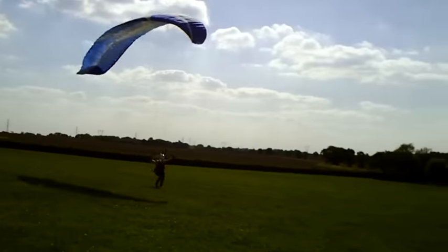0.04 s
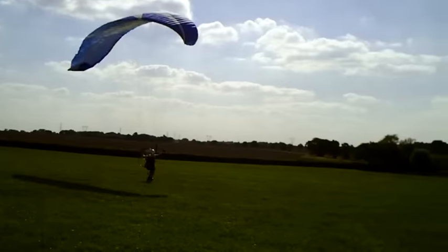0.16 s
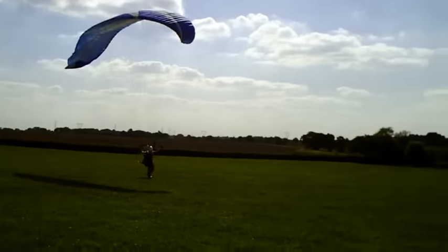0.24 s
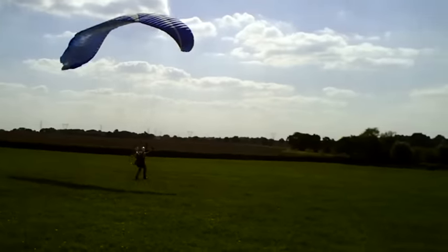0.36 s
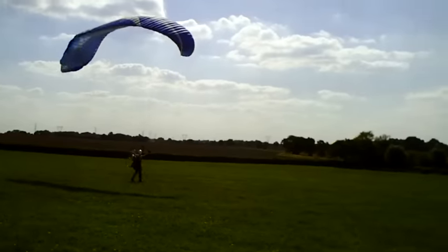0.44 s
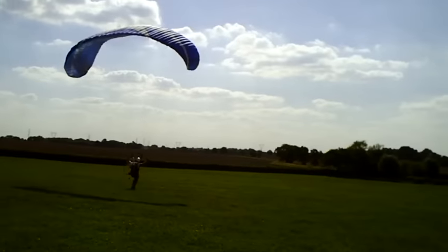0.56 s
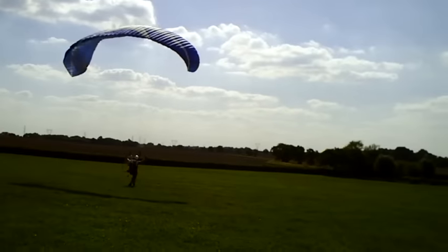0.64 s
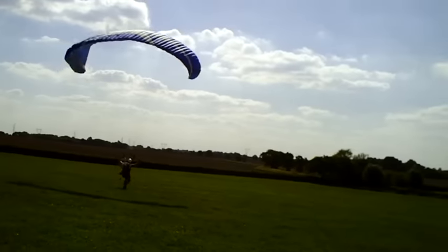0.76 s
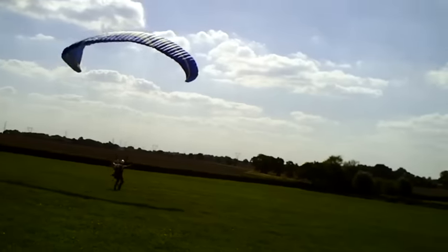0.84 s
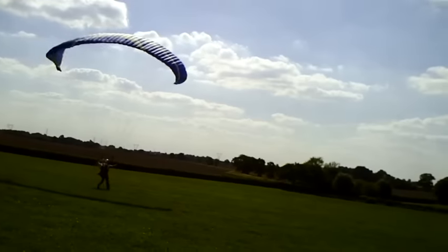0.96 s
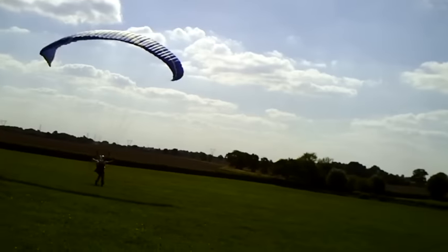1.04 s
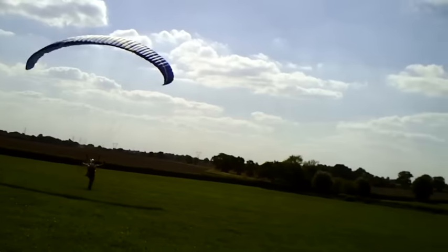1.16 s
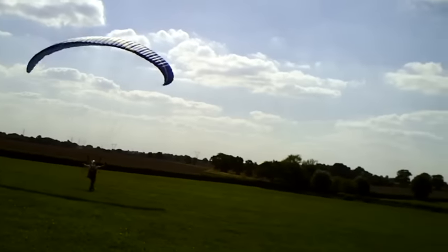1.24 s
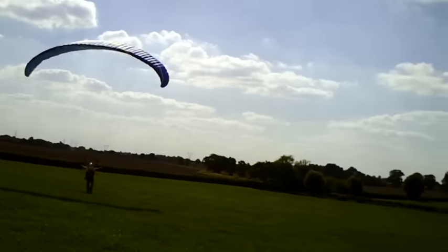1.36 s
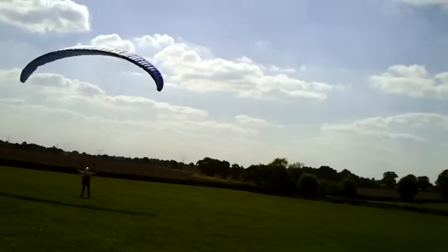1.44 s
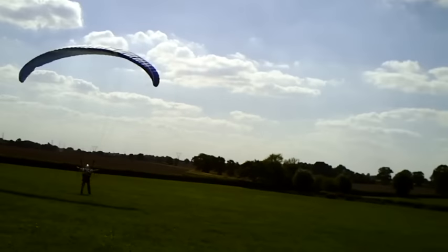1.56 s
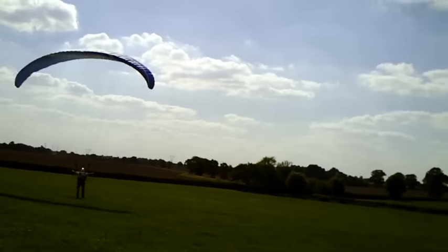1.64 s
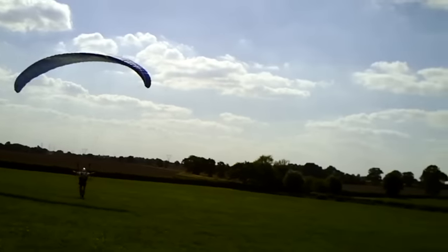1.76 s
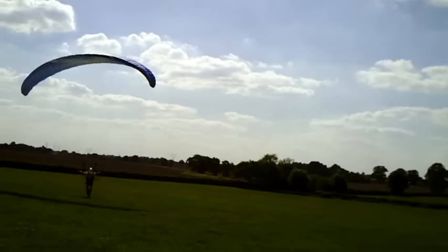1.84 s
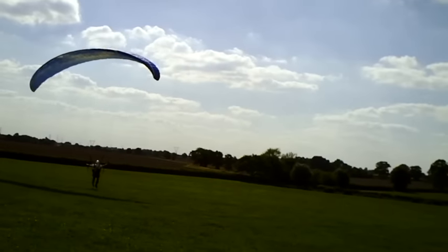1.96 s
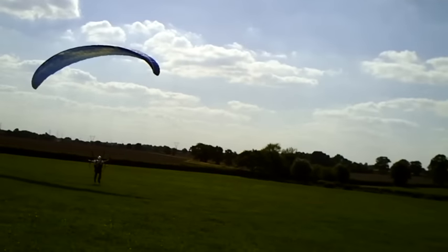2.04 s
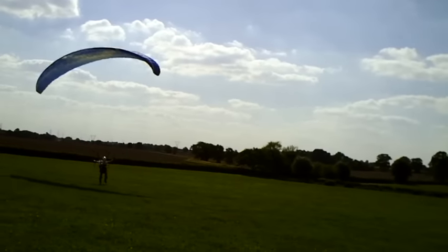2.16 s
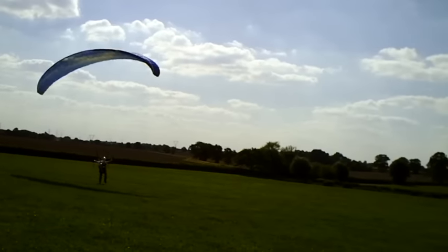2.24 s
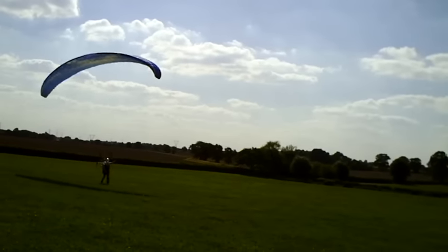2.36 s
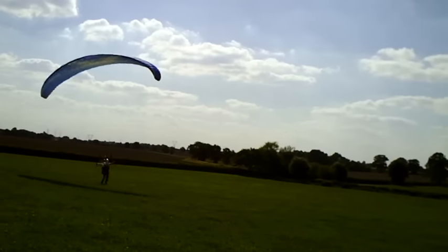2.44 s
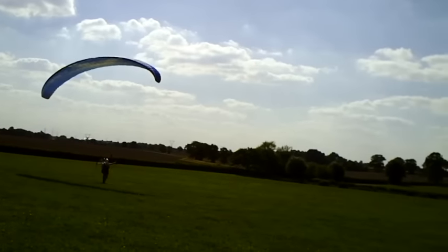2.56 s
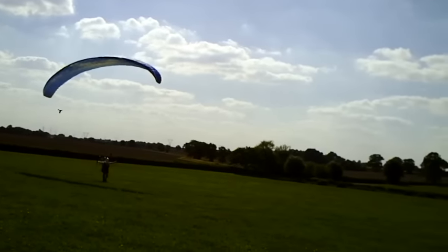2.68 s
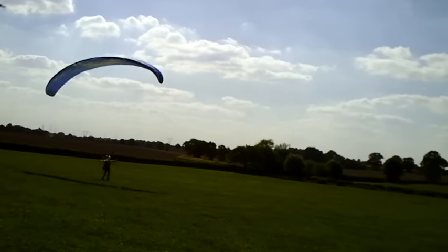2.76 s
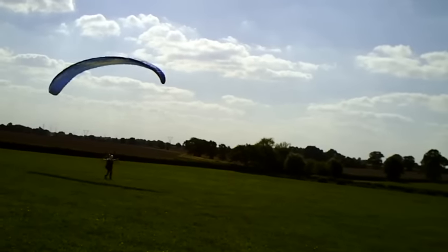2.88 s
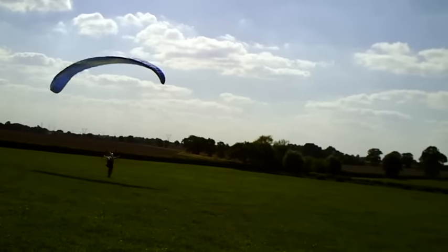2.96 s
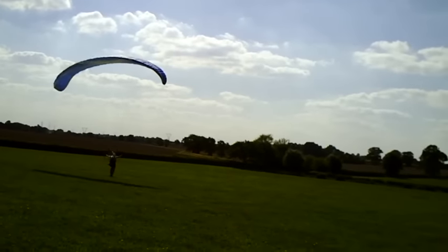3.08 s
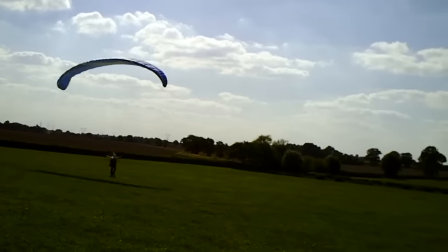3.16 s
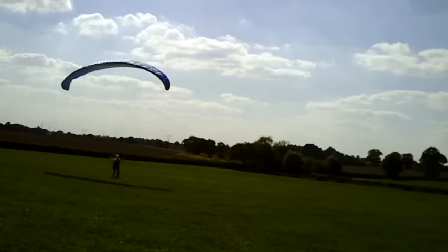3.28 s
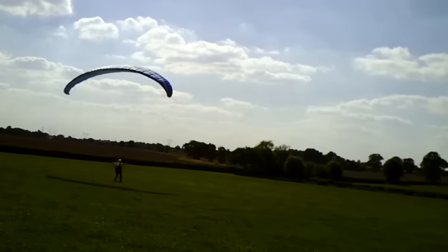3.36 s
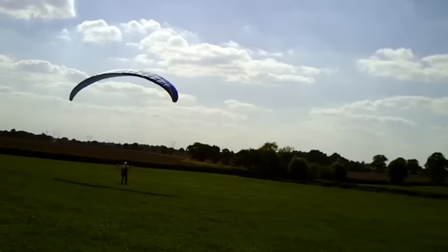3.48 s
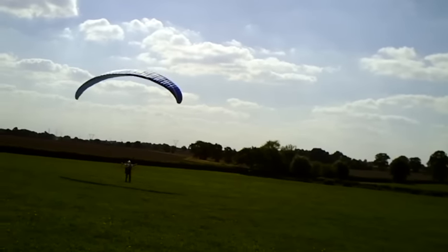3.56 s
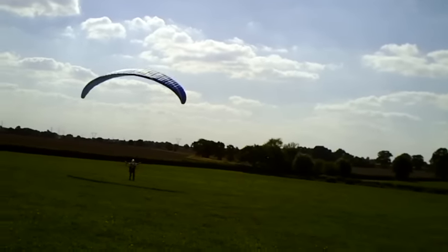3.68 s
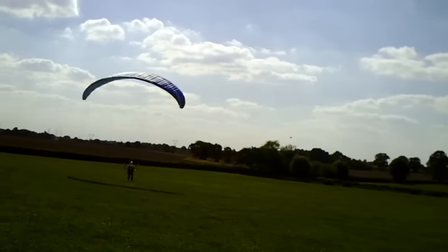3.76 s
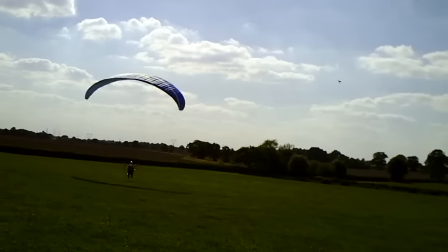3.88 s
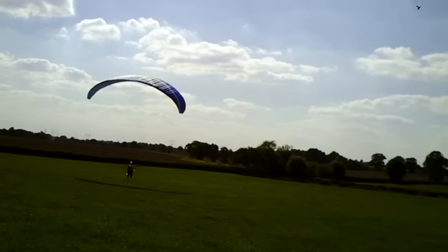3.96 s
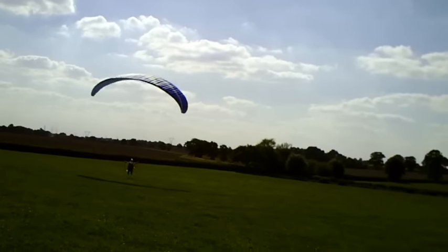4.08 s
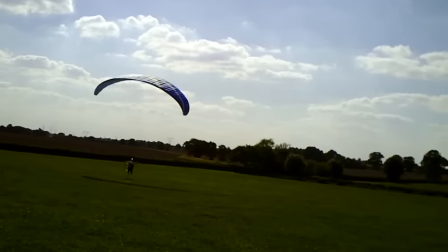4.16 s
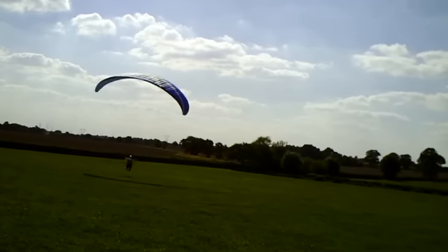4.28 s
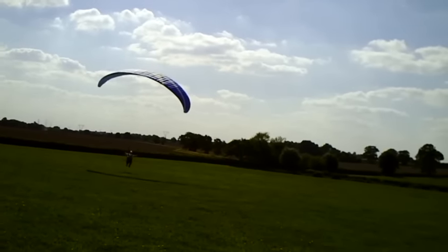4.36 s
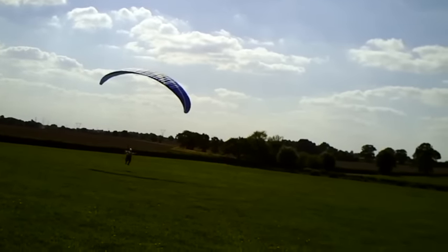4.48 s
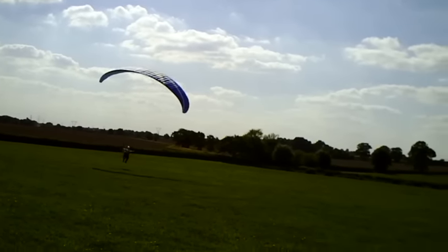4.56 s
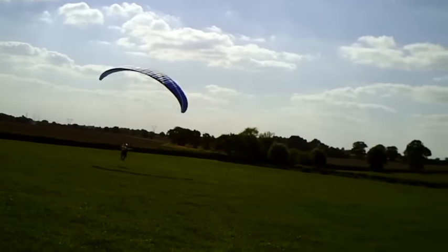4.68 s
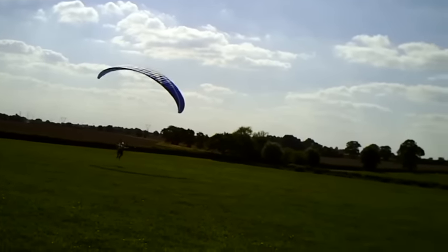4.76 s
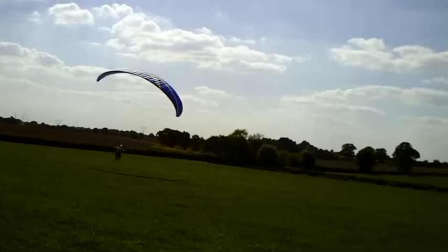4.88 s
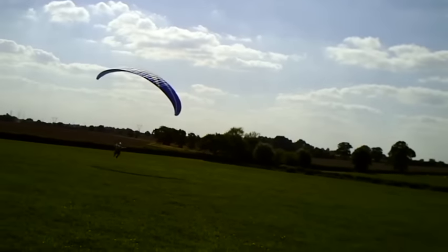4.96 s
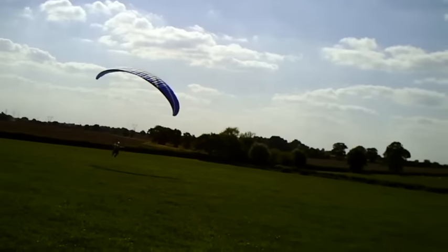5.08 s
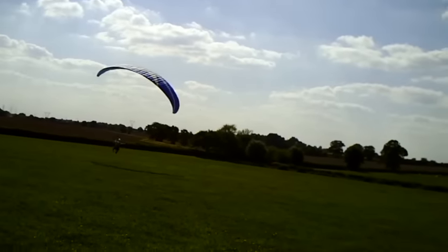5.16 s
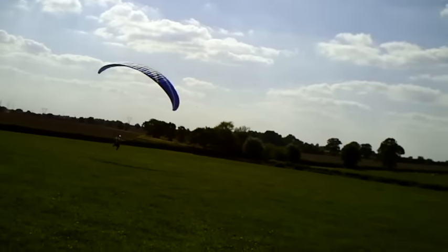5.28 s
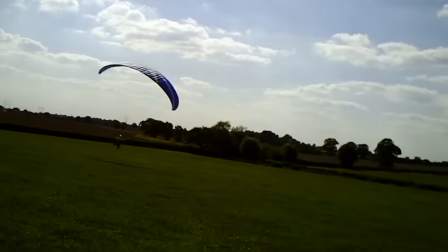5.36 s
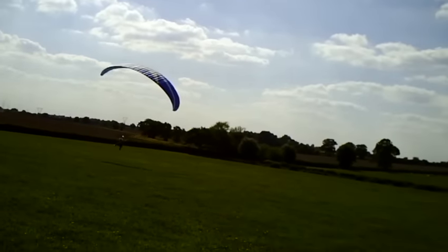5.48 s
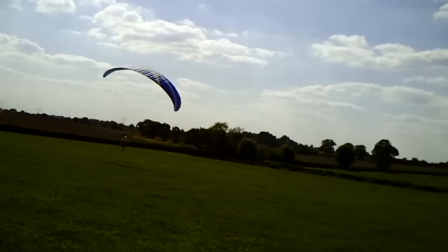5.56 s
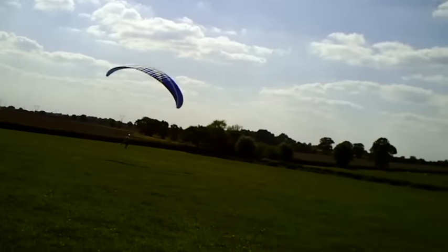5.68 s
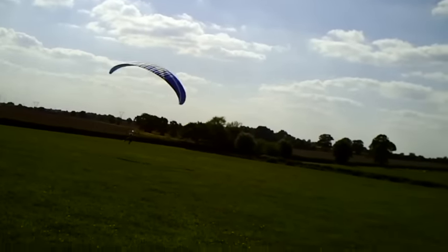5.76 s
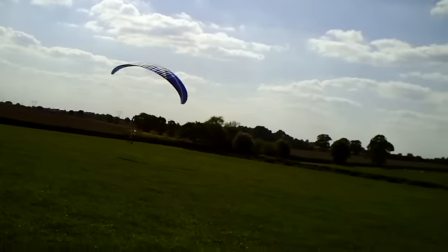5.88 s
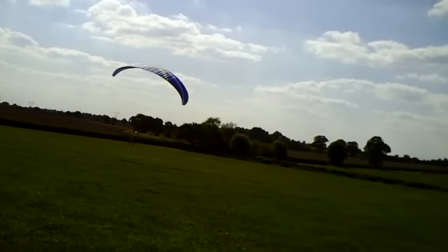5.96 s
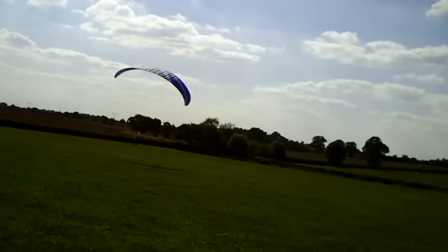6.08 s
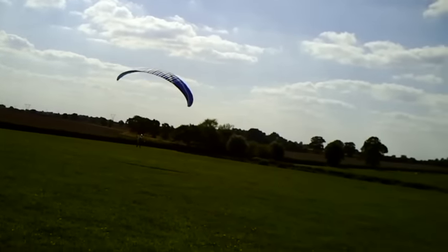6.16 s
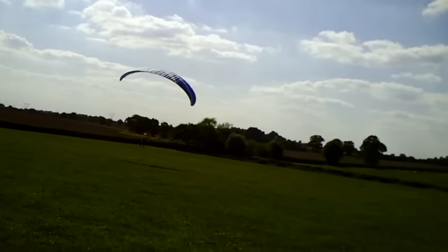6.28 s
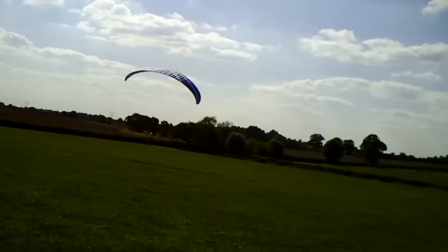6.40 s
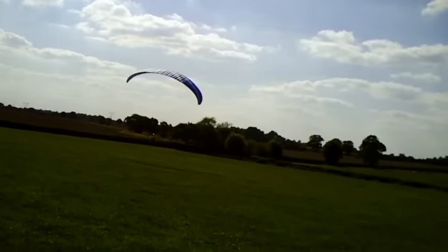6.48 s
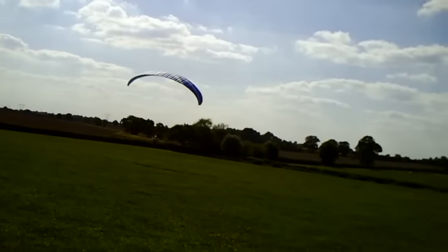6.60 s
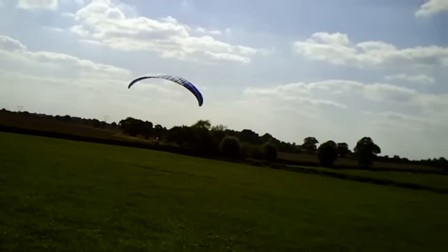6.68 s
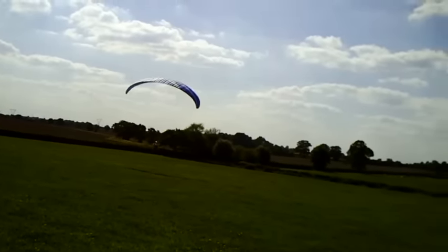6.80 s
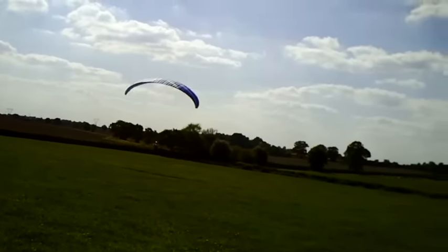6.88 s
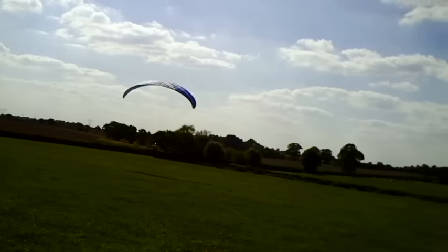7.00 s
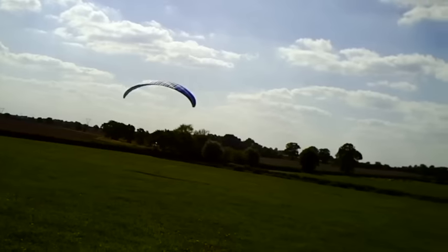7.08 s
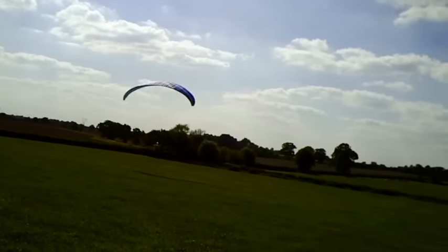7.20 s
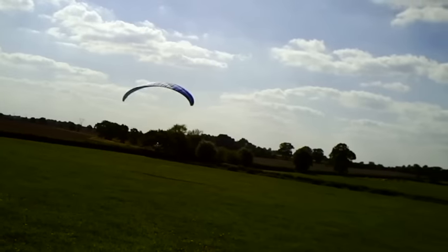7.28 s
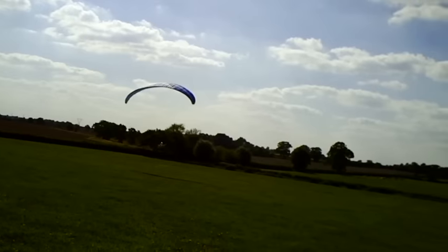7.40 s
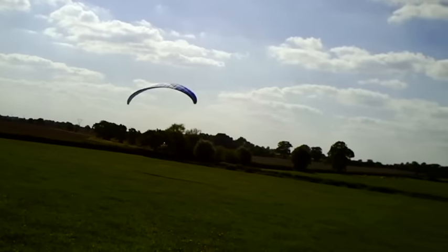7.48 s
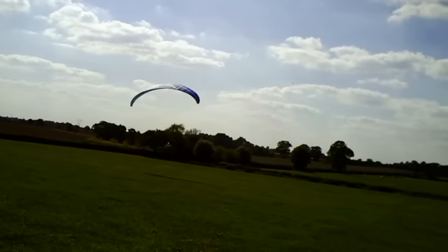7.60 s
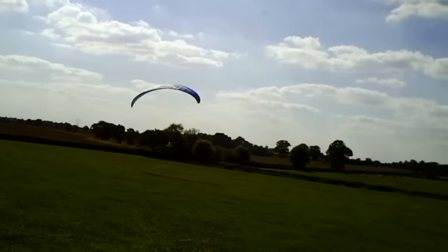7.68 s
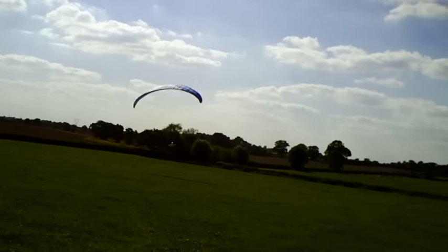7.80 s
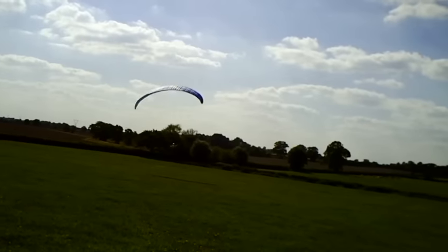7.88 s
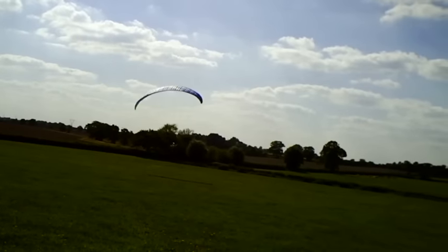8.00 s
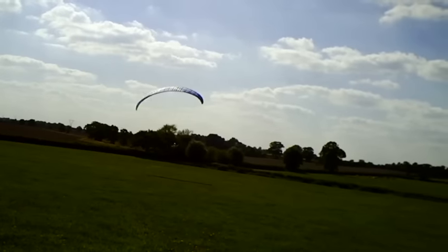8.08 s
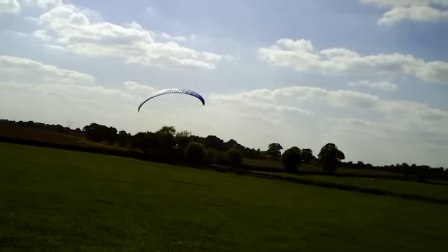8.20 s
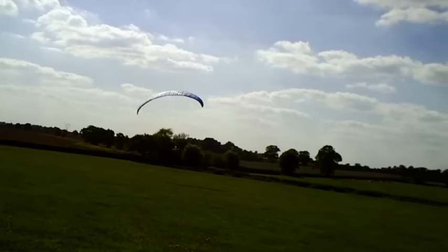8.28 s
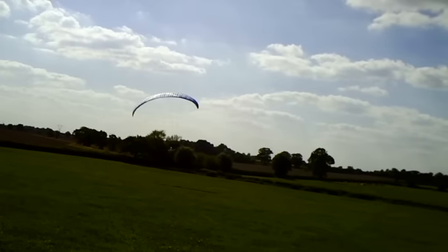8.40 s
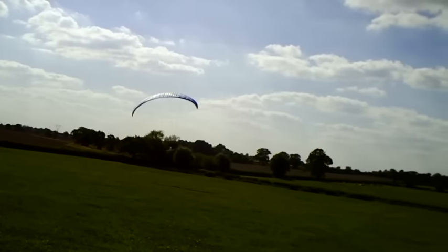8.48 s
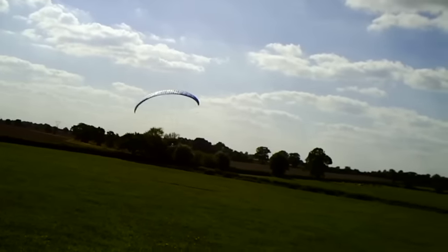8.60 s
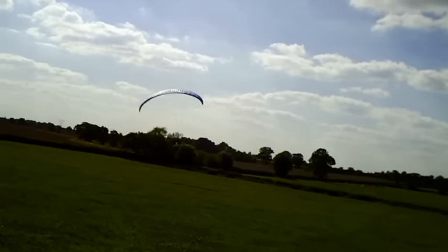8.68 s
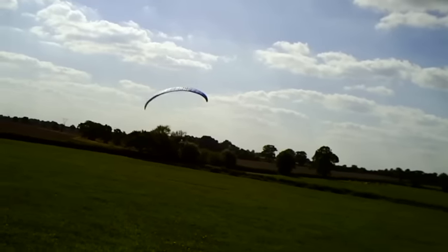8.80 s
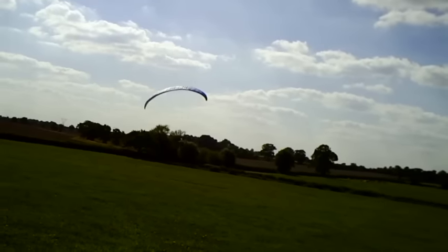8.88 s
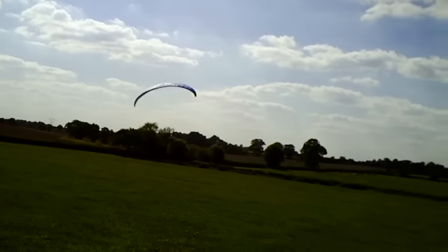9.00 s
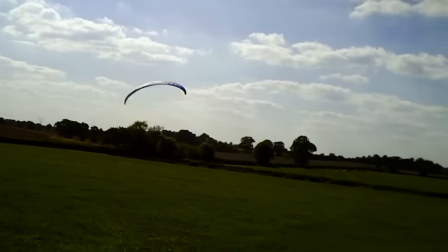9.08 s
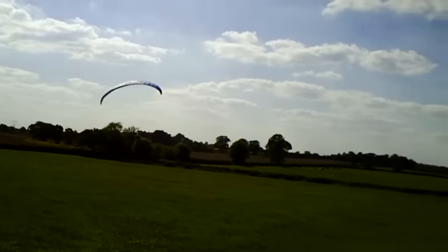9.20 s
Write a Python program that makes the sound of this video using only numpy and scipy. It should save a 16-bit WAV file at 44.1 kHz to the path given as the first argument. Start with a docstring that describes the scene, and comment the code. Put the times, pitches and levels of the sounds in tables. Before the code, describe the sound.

From 0 s a small two-stroke engine is already at full power, about twenty metres away on an open field: a fast, raspy, metallic bark of roughly 155 pops a second, with propeller wash and a low, steady drone beneath. Pitch barely changes. Hard cracks spit out around 0.5, 0.7 and 1.4 s, and light wind bumps the microphone early on. The bark dulls near 2 s, surges bright and harsh around 2.5-2.9 s with another crack, then weakens to a deep dip at 4 s. It returns more distant at 4.4-5.2 s, dips near 5.7 s, and swells ever more faintly around 6, 6.7, 7.4 and 8.3-8.7 s, with a hollow, shifting ground-reflection colour and thinning treble. Soft low gusts buffet the microphone near 6.2, 7.1, 8 and 8.6-9.1 s as the engine fades to a weak buzz by 9.2 s.

```python
"""A barking two-stroke is heard first: a paramotor at full power on a field, over a low drone.
It starts 22 m from the microphone, lifts off and climbs away; its sound swells and dulls as the pilot turns.
The single fires four times per propeller turn, and each pop rings the silencer and echoes off the blades.
Shaft-locked sines make the drone; the ground reflects the exhaust by a delayed copy.
Filtered noise makes the gusts that buffet the microphone, and a few firings crack much harder."""
import sys
import numpy as np
from scipy import signal
from scipy.fft import rfft, irfft, next_fast_len
from scipy.io import wavfile
from scipy.ndimage import map_coordinates

SR = 44100
rng = np.random.default_rng(int(sys.argv[2]) if len(sys.argv) > 2 else 0)


def int16_out(signal):
    """Quantize to a 16-bit WAV file."""
    q = np.round(np.clip(np.atleast_2d(signal).T, -1, 1) * 32767)
    wavfile.write(sys.argv[1], SR, q.astype(np.int16))


N = 407925

# In the tables, beamed is dB per dB of BARK_SWING's beaming, fades is dB per dB of distance loss.

# exhaust loudness as the pipe turns to and from the microphone: start_s, level_db
BARK_SWING = [(0.0, -12.5), (0.1, -13), (1.08, -17), (1.18, -13), (1.57, -17), (1.93, -25.5), (2.13, -25.5),
              (2.52, -14), (2.78, -12), (2.99, -15), (3.3, -15), (3.37, -17.5), (3.73, -19.5), (3.76, -22),
              (4.04, -34), (4.43, -19.5), (5.1, -16), (5.69, -23.5), (5.9, -18), (6.29, -23), (6.72, -20),
              (7.13, -26), (7.37, -22), (8.06, -26.5), (8.27, -21.5), (8.68, -21.5), (9.25, -36)]
# propeller shaft speed: start_s, speed_turns_per_s
SHAFT_SPEED = [(0, 38.74), (.2, 38.69), (.38, 38.9), (.55, 38.69), (1.2, 39.06), (1.55, 39.14),
               (1.75, 39.31), (2.7, 39), (3.1, 38.96), (3.3, 38.82), (4.2, 38.96), (5, 38.87), (5.6, 39.01),
               (6.7, 39.38), (7.95, 39.22), (8.25, 39.03), (8.7, 38.96), (9.25, 39.05)]
# the four firings of one propeller turn: direct_db, blade_echo_db, echo_delay_ms, jet_puff_db
FIRINGS = [(-4, -8.5, 2.06, -3), (-1.5, -5.5, 2.148, -5.5), (-0.5, -5.5, 2.188, 1.5),
           (-5.5, -8.5, 2.067, -3)]
# overall colour of the exhaust: pitch_hz, relative_level_db
EXHAUST_COLOUR = [(100, -53), (300, -19.5), (420, -22), (600, -8), (800, -9), (1050, -1.5), (1600, 3.5),
                  (2000, -4), (3100, -9), (4400, -12.5), (6800, -22), (9300, -25), (12800, -47.5),
                  (14000, -66)]
# narrow peaks and hollows of silencer and cage: pitch_hz, width_hz, level_db
SILENCER = [(1690, 120, 1.5), (2220, 107, -8.5), (2540, 116, 4), (2865, 33.5, -21), (3108, 160, 7.5),
            (3470, 172, -10), (4176, 36, 8), (4204, 130, -5), (5330, 227, -9.5), (5905, 54, -17),
            (6780, 190, 4), (8320, 160, -5.5)]
# change of colour once airborne and seen from behind: pitch_hz, width_hz, level_db
ASTERN = [(407, 76, -6.5), (4500, 750, -3.5), (5510, 240, 8.5), (7950, 210, -8), (8260, 160, 11.5)]
# passage into the airborne colour: start_s, airborne_share
LIFT_OFF = [(3.7, 0), (4.3, 1)]
# hardness of the pops, greatest with the pipe straight at the microphone: start_s, hard_edge_gain
HARDNESS = [(0, 0.6), (.7, 1.02), (1.45, .6), (1.85, 0.26), (2.3, 0.66), (2.8, 1.2), (2.88, 0.79),
            (2.95, 0.14), (3.7, 0), (4.8, 0.41), (9.25, 0)]
# tilt of the propeller wash: pitch_hz, relative_level_db
WASH_TILT = [(100, 11), (700, -3.5), (1100, 4.5), (1700, 1.5), (3000, -1.5), (12000, 1)]
# first cancellation by the ground reflection: start_s, pitch_hz, reflected_share
GROUND_NOTCH = [(0, 2200, 0.15), (5, 2240, 0.15), (5.6, 2050, 0.38), (6.9, 2260, 0.73), (7.2, 2020, 0.88),
                (8, 1890, 0.85), (8.6, 1860, 1), (9.25, 1500, 0.83)]
# body, bark and rasp of the exhaust:
# upper_edge_hz, head_on_db (before a common trim), beamed, fades, db_per_unit_of_hardness
RANGES = [(1006, -25.5, 0.55, 0.39, 0), (2060, -15, 1, 0.98, -2), (4920, -20.5, 0.87, 1, 3.5)]
# treble above those ranges: start_s, level_db
SIZZLE = [(0.0, -28), (1.03, -34), (1.11, -27.5), (1.91, -35), (2.24, -27.5), (2.81, -27.5), (4.04, -43),
          (4.38, -36.5), (5.07, -34.5), (5.77, -42.5), (5.95, -34.5), (6.18, -44), (6.54, -35.5),
          (7.13, -49), (7.34, -38), (7.91, -44), (8.94, -42), (9.25, -46.5)]
# low tones of the propeller: multiple_of_shaft_speed, starting_level_db, fades
BLADE_ORDERS = [(1, -37, 0.6), (2, -30, 1), (3, -29.5, 1.7), (5, -43, 0), (6, -29, 1.32), (7, -44.5, 1.3),
                (9, -36, 2.5), (11, -42.5, 3), (13, -38.5, 1.03), (15, -44, 0)]
# overtones of the tuned pipe: multiple_of_firing_rate, head_on_db, beamed, fades
PIPE_TONES = [(2, -33, -0.1, 1.3), (3, -35.5, 0.2, 2.15), (4, -34.5, .5, .5), (5, -36, 0.55, 0.27),
              (7, -31, 1.26, 0.8), (8, -31.5, 1, 0.5), (9, -34, 1.3, .7), (10, -30, 1.5, 0.63)]
# whine above the firing rate: start_s, level_db
WHINE = [(0, -36), (1.4, -31.5), (2, -39), (3.65, -28.5), (3.95, -48), (4.55, -32.5), (7.3, -40),
         (8.65, -27.5), (9.25, -37)]
# sidebands where the blades chop the exhaust: multiple_of_shaft_speed, head_on_db
BARK_ORDERS = [(17, -41), (19, -37), (21, -45), (22, -40), (23, -37), (25, -39.5), (26, -38), (27, -33.5),
               (29, -33.5), (30, -33), (31, -34.5), (34, -46), (37, -35), (38, -33), (41, -37)]
# hum at the firing rate: start_s, level_db
HUM = [(0, -19.5), (.95, -18), (1.5, -28), (2.1, -29.5), (2.33, -43), (2.6, -26), (3.05, -21), (3.7, -30),
       (4.7, -35), (6.5, -35), (7, -49), (8.6, -43), (9.25, -38)]
# gusts on the microphone: start_s, length_s, level_db
GUSTS = [(.3, 0.82, -32.5), (.72, 0.12, -27), (6.182, 0.37, -31), (7.106, 0.063, -33), (8.037, 0.35, -32.5),
         (8.58, .1, -31.5), (8.84, 0.29, -28)]
# colour of the buffeting: pitch_hz, relative_level_db
RUMBLE = [(15, -8), (35, -3), (90, 1), (170, -1), (280, -10.5), (450, -11.5), (1000, -39), (3000, -80)]
# colour of the air over the field: pitch_hz, relative_level_db
BREEZE = [(100, 0), (400, -5), (1500, -5), (4000, 2), (5500, -17), (9000, -17), (13000, -32)]
# the hardest exhaust cracks: start_s, level_db
CRACKS = [(.473, 3), (.712, 2), (1.399, 3), (1.450, 2), (2.855, 4), (3.478, -5), (5.136, -4), (5.535, -6),
          (6.872, -10)]

START_M, AWAY_M_PER_S = 22, 6.1  # distance at the start, and how fast it grows
HEAD_ON_DB = -12.5  # BARK_SWING value at the starting distance with the pipe facing the microphone
SIDEBAND_BEAMED, SIDEBAND_FADES = 1, 0.87
WHINE_MULTIPLE = 6  # of the firing rate
WAVER_DB_PER_MULTIPLE = 0.34  # higher overtones waver more in the moving air
GUST_RISE_S, GUST_FALL_S = 0.033, 0.12  # exponential time constants
LULL_DB = -43.5  # the buffeting between gusts
TOP_HZ = 13700  # upper limit of the microphone channel


def amp(db):
    """Decibels to gain."""
    return np.exp(np.asarray(db) * (np.log(10) / 20))


def unit(x):
    """Scale to rms 1."""
    return x / np.sqrt(np.mean(x ** 2) + 1e-20)


def along(points, hz):
    """Interpolate (pitch_hz, value) points on a log pitch axis."""
    pitch_hz, values = np.transpose(points)
    return np.interp(np.log(hz + 1), np.log(pitch_hz + 1), values)


def curves(rows):
    """One value per sample for each column after the time."""
    start_s, *columns = np.transpose(rows)
    t = np.arange(N) / SR
    return [np.interp(t, start_s, column) for column in columns]


def wobble(rate):
    """A smooth random curve, rate knots a second."""
    knots = rng.standard_normal(int(N * rate / SR) + 4)
    coarse = np.linspace(0, N, N // 128)
    smooth = map_coordinates(knots, [coarse * rate / SR])
    return np.interp(np.arange(N), coarse, smooth)


def filtered(x, response):
    """Multiply the spectrum of x by a response of frequency."""
    size = next_fast_len(N + SR // 2)
    hz = np.fft.rfftfreq(size, 1 / SR)
    return irfft(rfft(x, size) * response(hz), size)[:N]


def pulses(at, sizes):
    """Band-limited impulses at fractional sample positions."""
    taps = np.floor(at)[:, None] + np.arange(-7, 9)
    off = taps - at[:, None]
    shape = np.sinc(off) * np.cos(np.pi * off / 16) ** 2
    places = np.clip(taps, 0, N).astype(int).ravel()
    return np.bincount(places, (shape * sizes[:, None]).ravel(), N + 1)[:N]


def distance_loss():
    """Spreading loss as the craft moves away: a negative dB value for each sample."""
    return -20 * np.log10(1 + AWAY_M_PER_S * np.arange(N) / SR / START_M)


def heard(db, beamed, fades):
    """Gain of one part of the engine sound, from the heading of the pipe and the distance."""
    loss_db = distance_loss()
    beam_db = curves(BARK_SWING)[0] - HEAD_ON_DB - loss_db
    return amp(db + beamed * beam_db + fades * loss_db)


def silencer_ring(peaks, size=4096):
    """Minimum-phase, causal impulse response of the exhaust system, by way of its cepstrum."""
    hz = np.fft.rfftfreq(size, 1 / SR)
    db = along(EXHAUST_COLOUR, hz)
    for pitch_hz, width_hz, level_db in peaks:
        db = db + level_db * np.exp(-.5 * ((hz - pitch_hz) / width_hz) ** 2)
    cepstrum = irfft(np.log(amp(db)))
    cepstrum[1:size // 2] *= 2
    cepstrum[size // 2 + 1:] = 0
    return irfft(np.exp(rfft(cepstrum)))


def firings(turns, scatter_db, hard_db, jitter_ms, sway_ms, cage_db, cage_ms, jet_db, jet_ms, gusty_db, wash_db):
    """One uneven pop per firing, its echoes off blade and cage, a puff of jet noise, and the propeller's wash."""
    count = len(FIRINGS)
    at = np.interp(np.arange(1, int(turns[-1] * count)) / count, turns, np.arange(N))
    ms = np.arange(SR // 50) * 1000 / SR
    # the frame sways on the running pilot, so the echo paths shift and overtones trade strength
    sway = wobble(2.5)
    pops, puffs, fronts = np.zeros(N), np.zeros(N), np.zeros(N)
    for k, (direct_db, echo_db, delay_ms, puff_db) in enumerate(FIRINGS):
        nominal = at[k::count]
        chance = rng.standard_normal((len(nominal), 6))
        when = nominal + jitter_ms * chance[:, 0] * SR / 1000
        # about one charge in six burns harder than the rest
        harder_db = hard_db * np.clip(chance[:, 4] - 1, 0, 1)
        force_db = harder_db + scatter_db * np.clip(chance[:, 1], -2, 1.5)
        direct = pulses(when, amp(direct_db + force_db))
        lag_ms = delay_ms + jitter_ms * chance[:, 2] + sway_ms * sway[when.astype(int)]
        echo = pulses(when + lag_ms * SR / 1000, amp(echo_db + scatter_db * chance[:, 3]))
        pops -= direct + echo
        fronts += pulses(when, amp(force_db / 2))
        # the puff rasps most on the firing whose gas a blade cuts through
        gust_db = gusty_db * np.clip(chance[:, 5], -2, 1.5)
        puffs += pulses(when, amp(puff_db + force_db / 2 + gust_db))
        # each blade position scatters the pop in its own way
        for share in (np.cos(sway), np.sin(sway)):
            cage = rng.standard_normal(len(ms)) * np.exp(-ms / cage_ms)
            cage /= np.linalg.norm(cage)
            pops += amp(cage_db) * signal.oaconvolve(direct * share, cage)[:N]
    # a puff holds for a moment, then collapses
    jet_strength = signal.oaconvolve(puffs, np.exp(-(ms / jet_ms) ** 2))[:N]
    jet = jet_strength * rng.standard_normal(N)
    wash = filtered(rng.standard_normal(N), lambda hz: amp(along(WASH_TILT, hz)))
    # the front of each pop is a very short burst of gas noise, dying over 0.65 ms
    edge_strength = signal.oaconvolve(fronts, np.exp(-ms / 0.65))[:N]
    edge = edge_strength * rng.standard_normal(N)
    hiss = amp(jet_db) * unit(jet) + amp(wash_db) * wash
    return unit(pops), hiss, unit(edge)


def ground(x):
    """The reflection off the field lags by half a period of the cancelled frequency."""
    notch_hz, share = curves(GROUND_NOTCH)
    late = map_coordinates(x, [np.arange(N) - SR / (2 * notch_hz)])
    # the field returns less treble
    return x + share * filtered(late, lambda hz: 1 / (1 + (hz / 3200) ** 4))


def exhaust(turns):
    """The bark: clean pops below, more jet noise above; each range is beamed differently as the pilot turns."""
    pops, hiss, edge = firings(
        turns, scatter_db=2.5, hard_db=3.0, jitter_ms=0.043, sway_ms=0.18, cage_db=-4.5, cage_ms=1.8,
        jet_db=-4.5, jet_ms=2.82, gusty_db=2.0, wash_db=-4)
    treble = lambda hz: 1 / (1 + (2400 / (hz + 1)) ** 4)
    source = filtered(pops, lambda hz: amp(-5 * treble(hz)))
    source += filtered(hiss, lambda hz: amp(2.3 * treble(hz)))
    # while the pipe points at the microphone from nearby, each pop keeps its hard edge
    hardness = curves(HARDNESS)[0]
    source += hardness * filtered(edge, lambda hz: np.exp(-.5 * ((hz - 4000) / 1300) ** 2))
    aloft = curves(LIFT_OFF)[0]
    running = signal.oaconvolve(source * (1 - aloft), silencer_ring(SILENCER))
    flying = signal.oaconvolve(source * aloft, silencer_ring([*SILENCER, *ASTERN]))
    rest = ground((running + flying)[:N])
    ranges = np.zeros(N)
    for edge_hz, db, beamed, fades, hard_db in RANGES:
        band = filtered(rest, lambda hz: 1 / (1 + (hz / edge_hz) ** 12))
        rest = rest - band
        ranges += unit(band) * heard(db + hard_db * hardness, beamed, fades)
    # turbulent air makes the treble flutter
    sizzle = unit(rest) * amp(curves(SIZZLE)[0] + 0.89 * wobble(12))
    return amp(-0.51) * ranges + sizzle


def tone(turns, multiple, waver_db):
    """One shaft order, rms 1 before its waver; the higher it is, the more its phase wavers in the moving air."""
    phase = 2 * np.pi * (multiple * turns + rng.random()) + 0.022 * multiple * wobble(9)
    return np.sqrt(2) * np.sin(phase) * amp(waver_db * wobble(4))


def drone(turns):
    """Sines locked to the shaft: the blades, the firing rate, the tuned pipe and its blade sidebands."""
    per_turn = len(FIRINGS)
    loss_db = distance_loss()
    blades, pipe, sidebands = np.zeros(N), np.zeros(N), np.zeros(N)
    for k, db, fades in BLADE_ORDERS:
        blades += amp(db + fades * loss_db) * tone(turns, round(k), waver_db=1.24)
    for k, db, beamed, fades in PIPE_TONES:
        overtone = tone(turns, per_turn * round(k), WAVER_DB_PER_MULTIPLE * k)
        pipe += heard(db, beamed, fades) * overtone
    whine = amp(curves(WHINE)[0]) * tone(turns, per_turn * WHINE_MULTIPLE, waver_db=2.0)
    for k, db in BARK_ORDERS:
        sidebands += amp(db) * tone(turns, round(k), waver_db=2.4)
    sidebands *= heard(0, SIDEBAND_BEAMED, SIDEBAND_FADES)
    # the fundamental swings with the pops
    hum = -amp(curves(HUM)[0]) * np.sqrt(2) * np.cos(2 * np.pi * per_turn * turns)
    return blades + pipe + whine + sidebands + hum


def wind():
    """Gusts buffet the microphone in lumps of low noise, over a faint steady hiss of air."""
    t = np.arange(N) / SR
    strength = amp(LULL_DB)
    for start_s, length_s, db in GUSTS:
        before = np.maximum(start_s - t, 0) / GUST_RISE_S
        after = np.maximum(t - start_s - length_s, 0) / GUST_FALL_S
        strength = np.maximum(strength, amp(db) * np.exp(-(before + after)))
    rumble = filtered(rng.standard_normal(N), lambda hz: amp(along(RUMBLE, hz)))
    lumps = amp(2.4 * wobble(22))
    hiss = filtered(rng.standard_normal(N), lambda hz: amp(along(BREEZE, hz)))
    return strength * unit(rumble * lumps) + amp(-40) * unit(hiss)


def cracks():
    """Now and then a firing goes off much harder, ringing the silencer with a short spit of gas."""
    start_s, level_db = np.transpose(CRACKS)
    ring = silencer_ring(SILENCER)
    blows = pulses(start_s * SR, amp(level_db))
    decay = np.exp(-1 / (.001 * SR))  # over 1 ms
    spit = .2 * signal.lfilter([1], [1, -decay], blows) * rng.standard_normal(N)
    return signal.oaconvolve(spit - blows, ring / np.abs(ring).max())[:N]


def scene():
    """One shaft drives the bark and the drone; cracks and wind keep their own times."""
    turns = np.cumsum(curves(SHAFT_SPEED)[0]) / SR
    return (exhaust(turns) + drone(turns) + wind() + cracks())[None]


def record(dry):
    """The microphone channel clips the tallest peaks and then passes nothing above its band limit."""
    clipped = np.clip(dry[0], -1, 1)
    return filtered(clipped, lambda hz: hz < TOP_HZ)[None]


dry = scene()
out = record(dry)
int16_out(out)
```